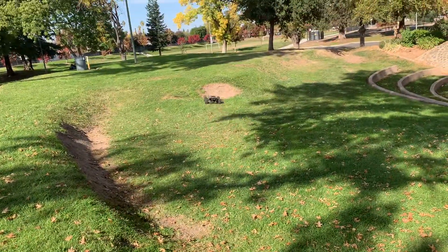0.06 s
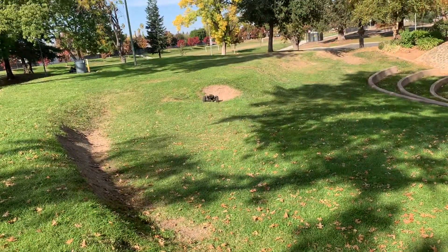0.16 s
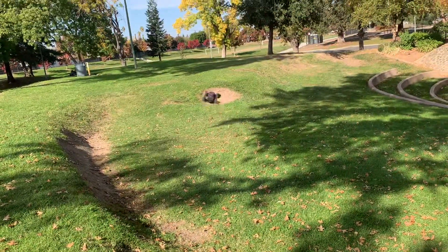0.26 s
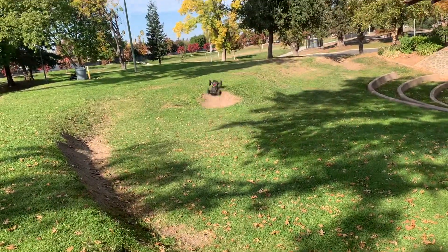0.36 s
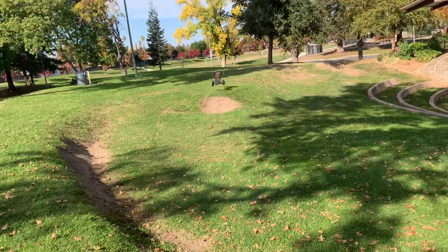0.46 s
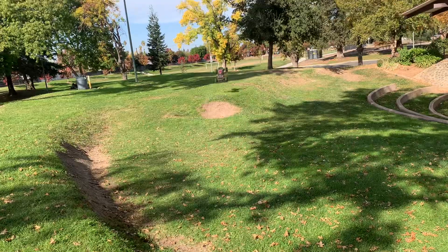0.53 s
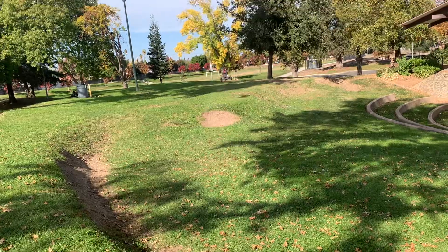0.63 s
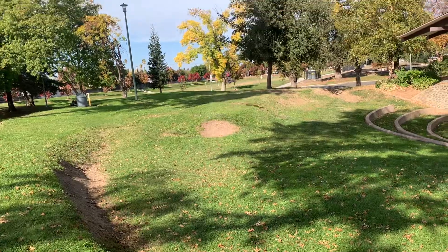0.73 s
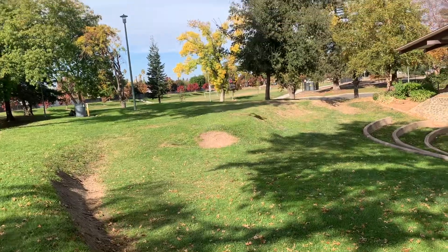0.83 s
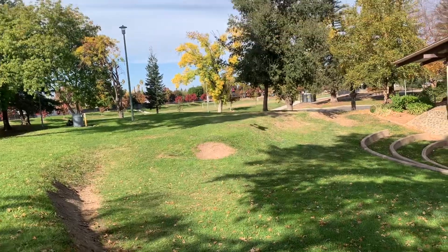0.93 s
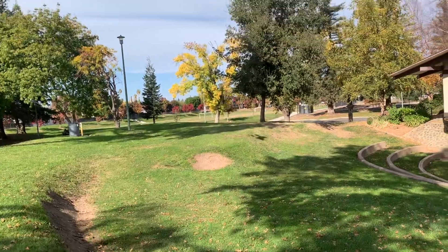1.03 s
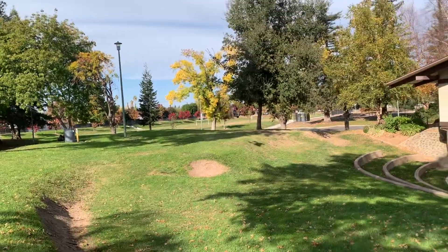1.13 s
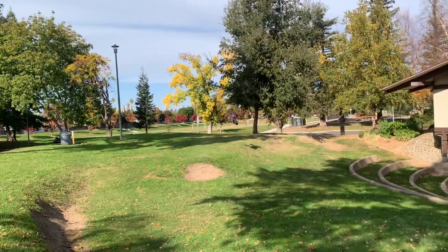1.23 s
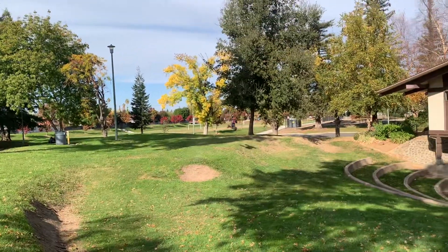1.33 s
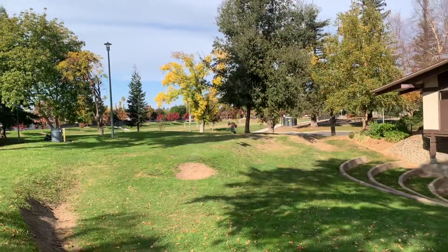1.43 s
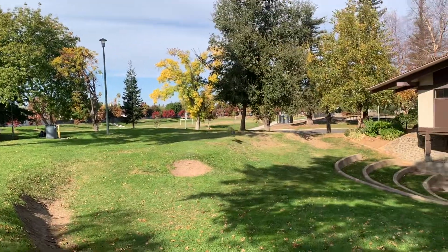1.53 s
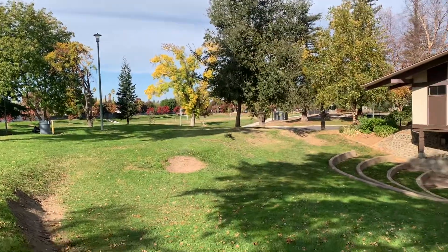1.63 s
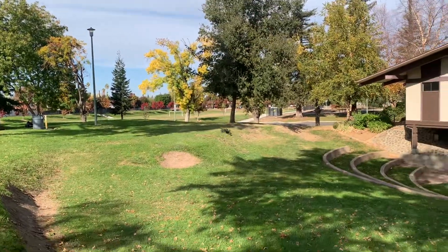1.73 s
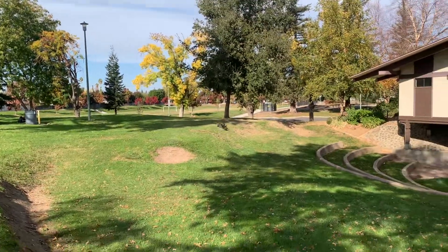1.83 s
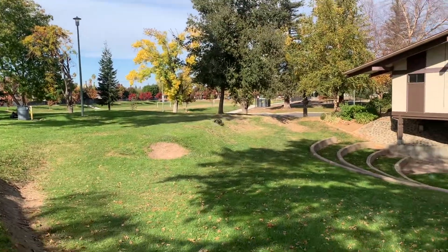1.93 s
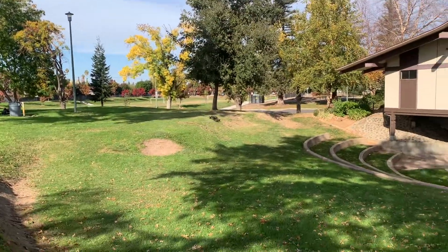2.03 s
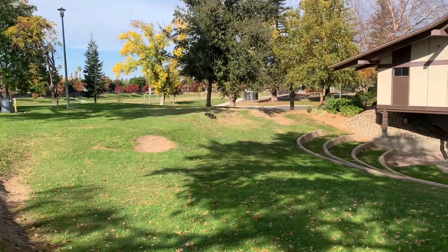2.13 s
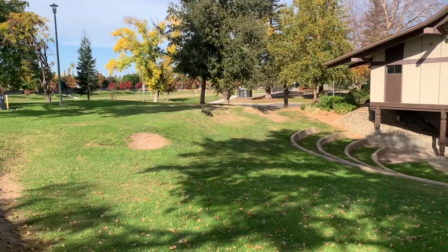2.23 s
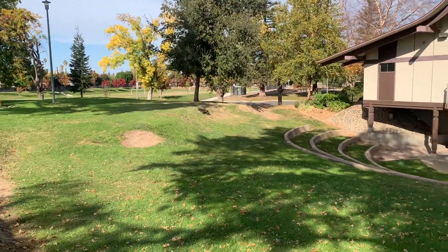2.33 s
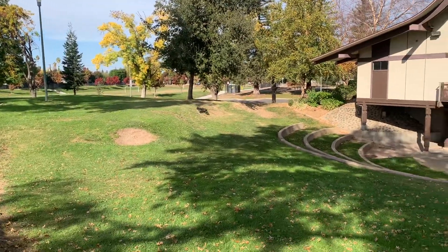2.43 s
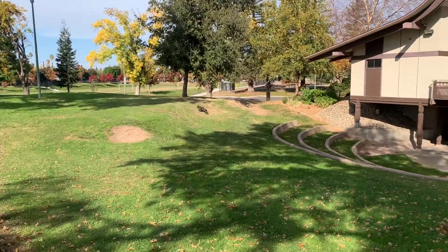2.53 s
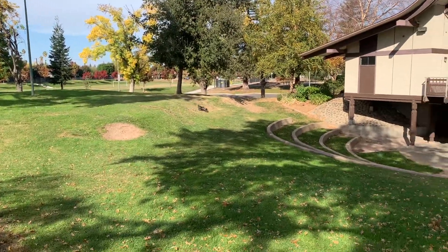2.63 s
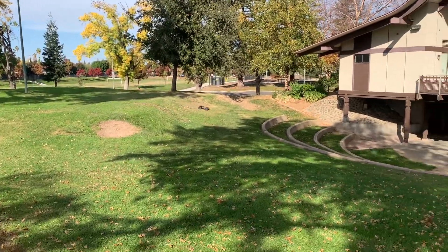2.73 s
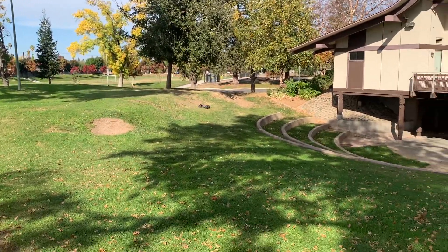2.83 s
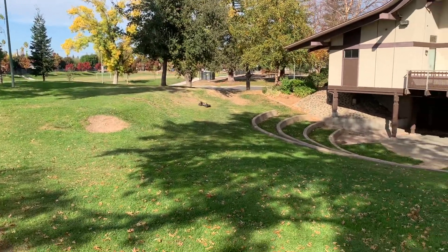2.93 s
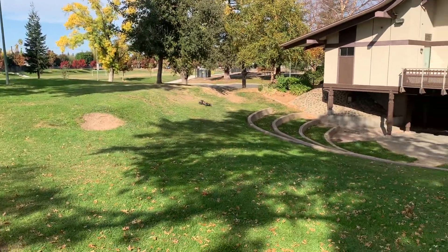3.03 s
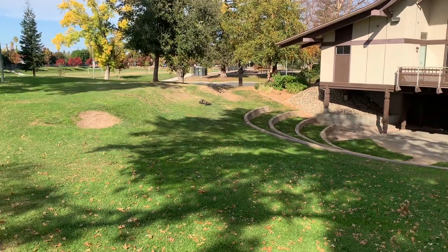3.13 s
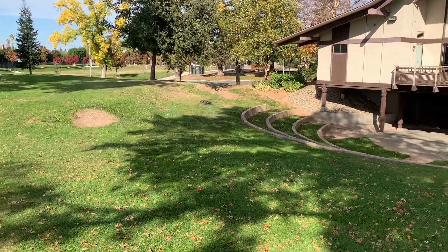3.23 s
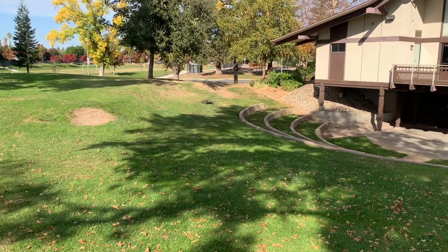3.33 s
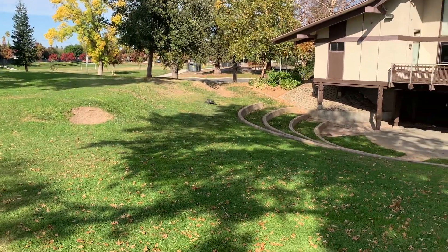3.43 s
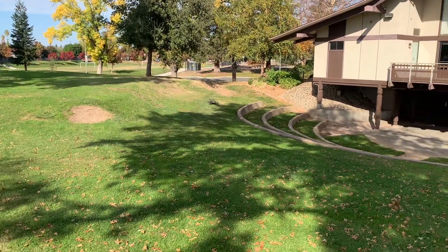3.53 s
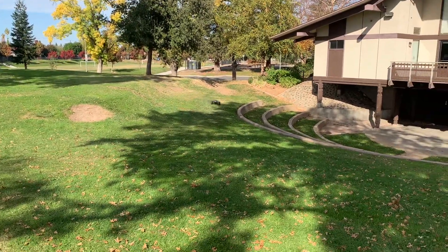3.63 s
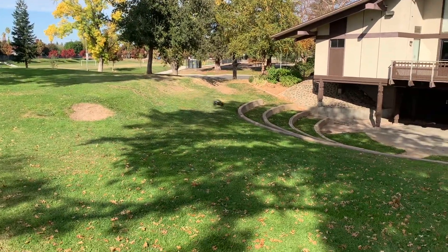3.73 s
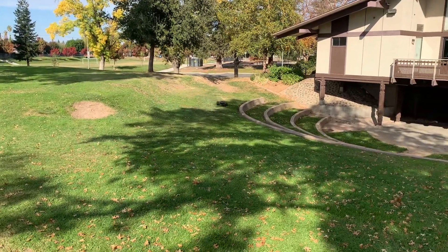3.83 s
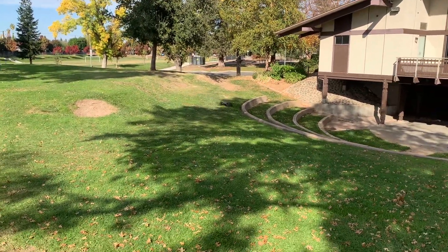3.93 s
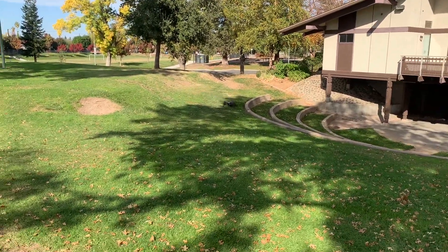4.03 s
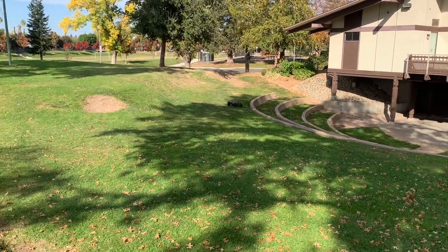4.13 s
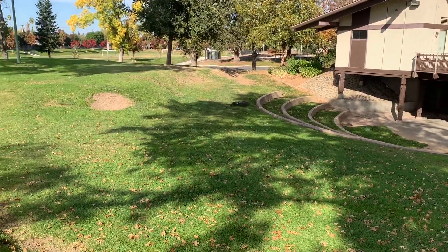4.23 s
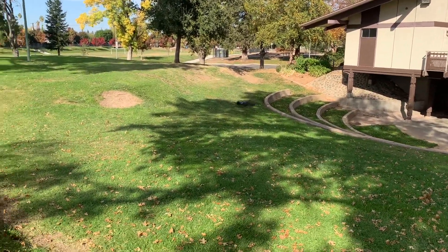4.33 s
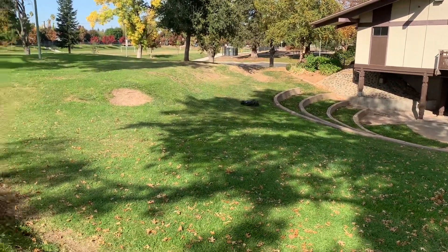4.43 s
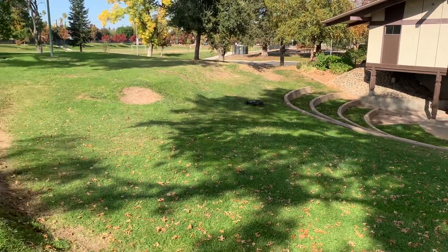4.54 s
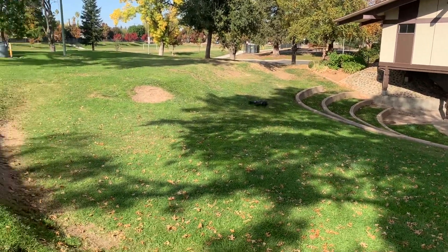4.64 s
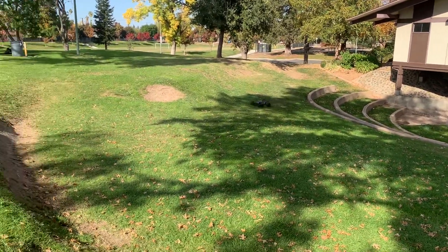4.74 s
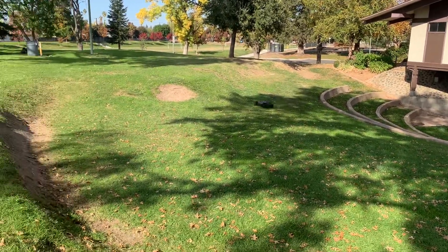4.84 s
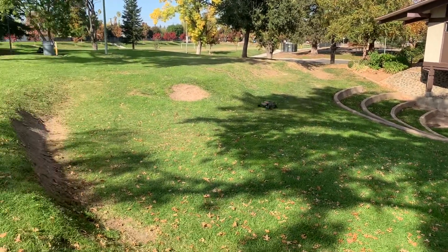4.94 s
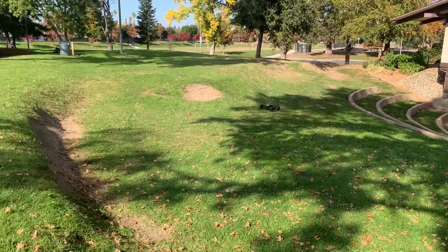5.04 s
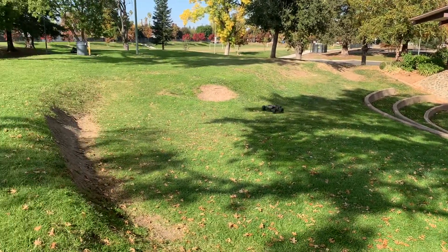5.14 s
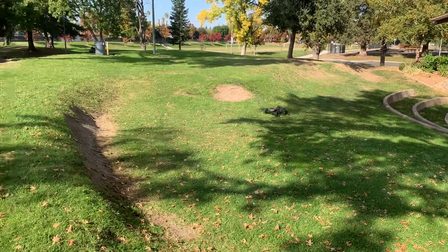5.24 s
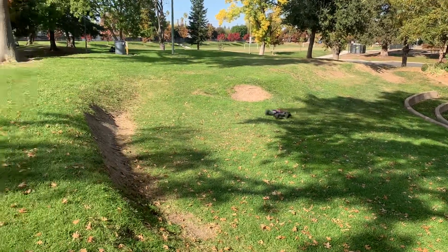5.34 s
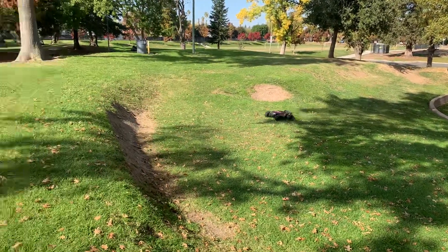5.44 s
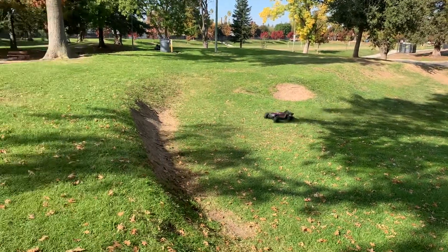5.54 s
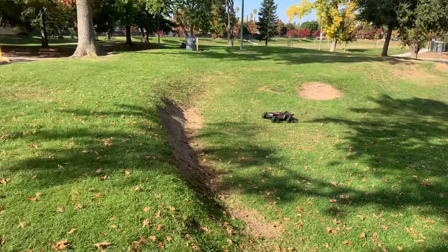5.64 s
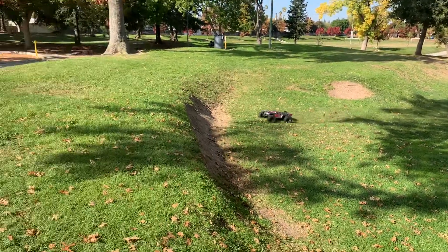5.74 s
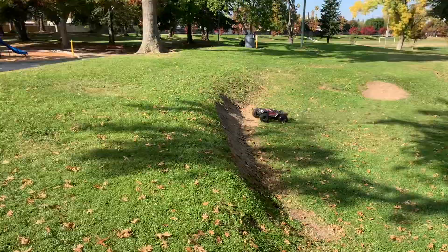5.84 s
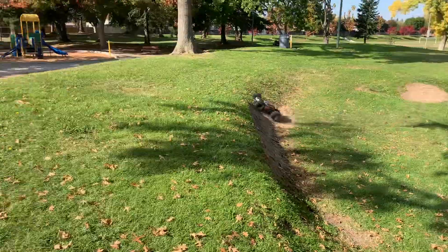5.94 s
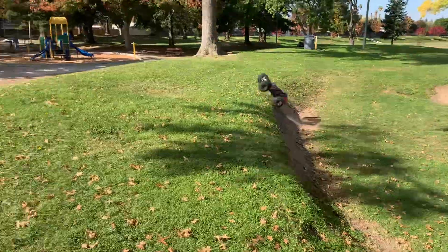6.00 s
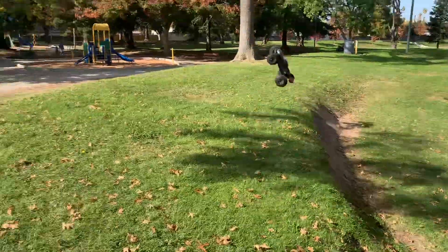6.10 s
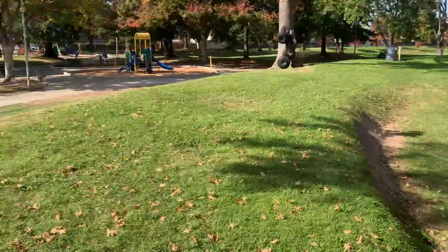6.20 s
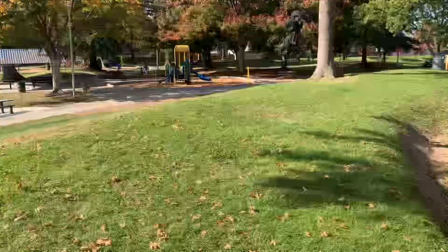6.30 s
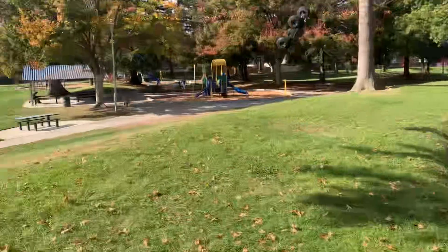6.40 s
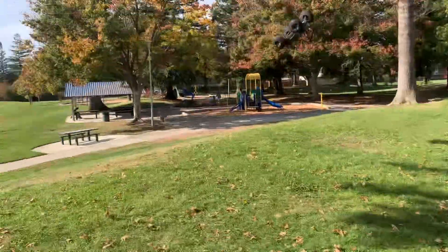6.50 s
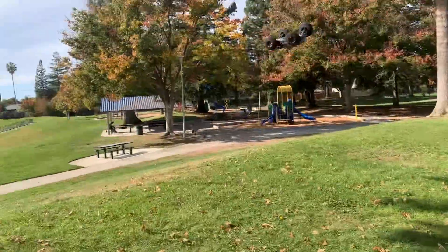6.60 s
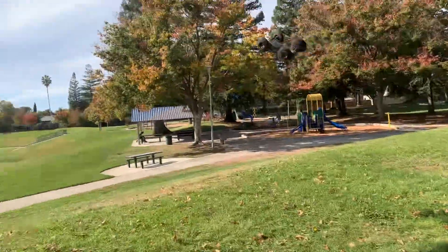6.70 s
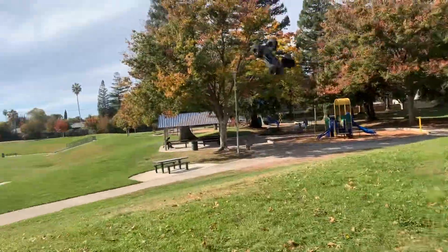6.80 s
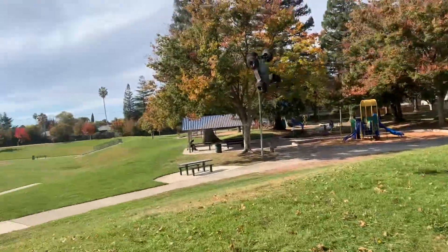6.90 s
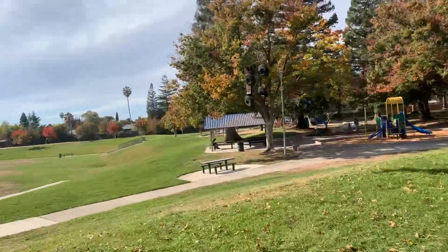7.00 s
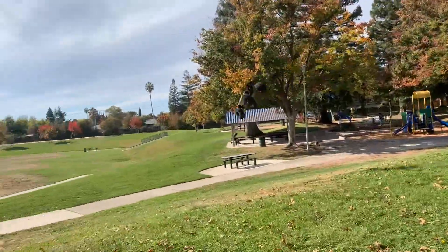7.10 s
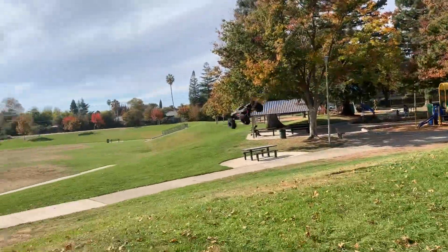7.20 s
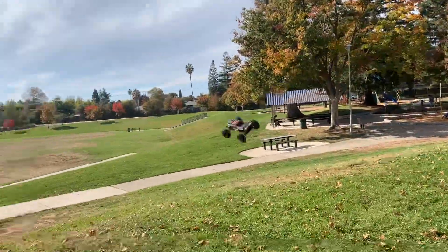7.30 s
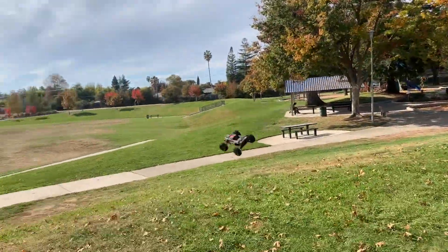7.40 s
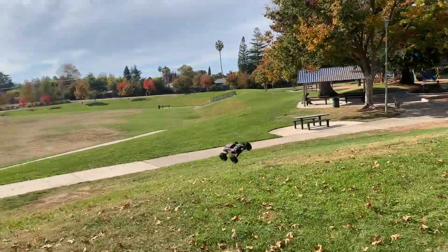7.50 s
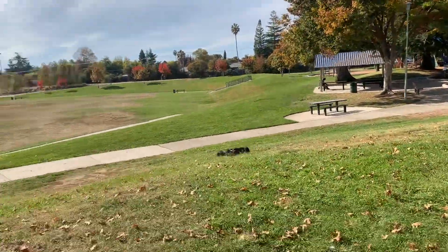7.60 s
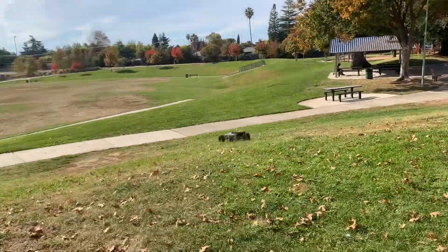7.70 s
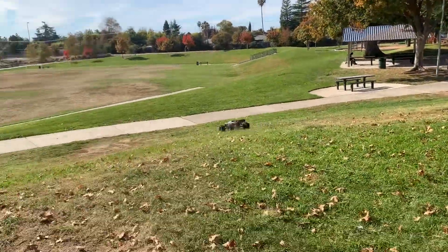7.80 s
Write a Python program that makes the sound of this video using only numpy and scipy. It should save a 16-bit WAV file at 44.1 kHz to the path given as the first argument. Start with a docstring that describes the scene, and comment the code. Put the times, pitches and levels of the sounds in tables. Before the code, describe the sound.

Gritty tyre scrapes, shrill electric throttle bursts and hard dirt knocks, a quiet distant stretch, then a loud jump with whirring, howling wheels and a thumping landing.

```python
"""A remote-control electric truck races over park grass, jumps two dirt mounds, tumbles with spinning wheels and lands.
Shaped noise makes its tyres and gears, fuzzy gliding tones its shell, ringing steel, motor and howling treads.
Throttle blips sweep the gear and motor whine; decaying sines thump and rattle, noise bursts tick through the frame.
Slams drum clods on the belly, far traffic rumbles, and two closely spaced microphone ports hear it all."""
import sys
import numpy as np
from scipy import signal
from scipy.fft import rfft, irfft, next_fast_len
from scipy.io import wavfile
from scipy.ndimage import uniform_filter1d, map_coordinates

SR = 44100
rng = np.random.default_rng(int(sys.argv[2]) if len(sys.argv) > 2 else 0)


def to_wav(sig):
    """Store sig (one row per channel, or 1-D mono) as 16-bit WAV at the path in sys.argv[1].

    Samples outside -1..1 are clipped; the rate is SR.
    """
    pcm = np.clip(np.atleast_2d(sig), -1, 1) * 32767
    pcm = np.round(pcm).astype(np.int16)
    wavfile.write(sys.argv[1], SR, pcm.T)  # frames by channels


N = 346626
T = np.arange(N) / SR
STRIKE_T = np.arange(SR // 4) / SR  # time within one knock, s
TOP_HZ = 15800  # upper band limit


def amp(db):
    """Gain of a dB value."""
    return 10 ** (np.asarray(db) / 20)


def unit(x):
    """x at rms 1."""
    return x / np.sqrt(np.mean(np.abs(x) ** 2) + 1e-20)


def together(*levels_db):
    """Level of unrelated sounds heard at once: their powers add."""
    return 10 * np.log10(sum(amp(db) ** 2 for db in levels_db))


def curves(rows):
    """One value per sample for each column after the time."""
    s, *cols = np.transpose(rows)
    return [np.interp(T, s, c) for c in cols]


def gate(rows, fade=0.0074):
    """1 while a table lasts, with soft ends."""
    return np.clip(np.minimum(T - rows[0][0], rows[-1][0] - T) / fade, 0, 1)


def wobble(rate):
    """A smooth random curve, rate knots a second."""
    return map_coordinates(rng.standard_normal(int(N * rate / SR) + 4), [T * rate])


def drift(shape, over_bins, over_frames):
    """A random field of rms 1, smooth over so many bins and frames."""
    field = uniform_filter1d(rng.standard_normal(shape), size=over_bins, axis=0)
    return unit(uniform_filter1d(field, size=over_frames, axis=1))


def filtered(x, response):
    """x times a complex response of frequency."""
    m = next_fast_len(N + 8192)
    return irfft(rfft(x, m) * response(np.fft.rfftfreq(m, 1 / SR)), m)[..., :N]


def resonances(modes):
    """Causal response of damped modes (pitch_hz, width_hz, level_db), alternating in sign."""
    def mode(f, c, w, db):
        return amp(db) * 1j * f * w / (c * c - f * f + 1j * f * w)
    return lambda f: sum((-1) ** k * mode(f, *row) for k, row in enumerate(modes))


def noise(points, patchy_db):
    """Noise of rms 1 with a drawn spectrum and time-frequency patches of random gain."""
    z = signal.stft(rng.standard_normal(N), nperseg=512)[2]
    x = signal.istft(z * amp(patchy_db * drift(z.shape, 5, 6)), nperseg=512)[1][:N]
    f, db = np.transpose(points)

    def spectrum(hz):
        return amp(np.interp(np.log(hz + 1), np.log(f), db, left=-120, right=-120))
    return unit(filtered(x, spectrum))


def tone(hz, width_hz, rough):
    """A gliding partial near rms 1: its rough share of the power is noise of the given width."""
    rough = np.clip(rough, 0, 1)
    fuzz = (wobble(width_hz) + 1j * wobble(width_hz)) / np.sqrt(2)
    carrier = np.exp(2j * np.pi * np.cumsum(hz) / SR)
    return np.sqrt(2) * np.real((np.sqrt(1 - rough) + np.sqrt(rough) * fuzz) * carrier)


LOAD_LEAD_S = 0.029  # the gears hiss before the whine comes through
LOAD_RISE_S, LOAD_FALL_DB_PER_S = 0.072, 62


def throttle_load():
    """Each throttle blip loads the gears, swells while it lasts, then falls away; level in dB."""
    blips_db = []
    for s, length, *_, load_db, _, _, swell_db in BLIPS:
        rise_db = 20 * np.log10(np.clip((T - s + LOAD_LEAD_S) / LOAD_RISE_S, 1e-4, 1))
        growing_db = swell_db * (np.clip((T - s) / length, 0, 1) - 1) / 2
        fall_db = LOAD_FALL_DB_PER_S * np.clip(T - s - length, 0, 3)
        blips_db.append(load_db + rise_db + growing_db - fall_db)
    return together(*blips_db)


# wheels light or off the ground: from_s, to_s, share spinning free (0-1)
FLIGHTS = [(-.3, 0.175, 0.26), (0.47, 1.562, 0.7), (6.01, 7.55, 0.9)]
LIFT_S = 0.21  # the wheels unload and load again over this time


def spinning_free():
    """Share of the wheels spinning without ground load, 0 to 1."""
    free = sum(np.clip(share, 0, 1) * np.clip(.5 + np.minimum(T - a, b - T) / LIFT_S, 0, 1)
               for a, b, share in FLIGHTS)
    return np.clip(free, 0, 1), free


# drivetrain between blips, louder when near and when the wheels spin fast: time_s, gear hiss_db, ringing_db
ROLL = [(0, -47.5, -33.5), (.228, -44.5, -42.5), (.55, -38, -39.5), (.65, -42, -41.5), (1.3, -48, -45),
        (1.55, -45, -53), (1.63, -68, -90), (1.7, -76, -104), (1.8, -44.5, -67), (2.36, -71, -67),
        (2.7, -52, -51), (2.92, -70, -69), (3.23, -71, -68), (3.5, -59, -71), (3.87, -43, -43),
        (4.22, -44, -39), (4.53, -58, -57), (5.0, -52.5, -40), (5.7, -37.5, -30.5), (6.2, -36, -33),
        (6.356, -38, -32.5), (6.542, -29.5, -24), (6.702, -33, -33.5), (6.766, -33, -25.5),
        (6.966, -30.5, -31), (7.18, -32.5, -27), (7.402, -30, -36.5), (7.53, -48.5, -58), (7.62, -54, -59),
        (7.75, -45.5, -50), (7.86, -70, -70)]
# gains from rolling, throttle load and slams into each part, dB
ROLL_TO_SCRAPE_DB, LOAD_TO_SCRAPE_DB, SLAM_TO_SCRAPE_DB = 1.7, 0.3, -6.5
ROLL_TO_WHIRR_DB, LOAD_TO_WHIRR_DB, SLAM_TO_WHIRR_DB = -6, -9.5, -22.5
SLAM_TO_HISS_DB, LOAD_TO_RING_DB, SLAM_TO_RING_DB = -15, 0.55, -21
SCRAPE_GROWS, RING_GROWS, MEAN_LOAD_DB = 0.61, 1.54, -50  # dB per dB around the mean load
FREE_SCRAPE_DB = -7  # tyres in the air are quieter


def levels():
    """Rolling, throttle load and slams set the levels of tyres, shell, gears and ringing steel."""
    roll_db, steel_db = curves(ROLL)
    load_db, slam_db = throttle_load(), slams()
    free, lift = spinning_free()

    def grown(db, rate):
        return MEAN_LOAD_DB + rate * (db - MEAN_LOAD_DB)
    scrape_db = together(grown(roll_db, SCRAPE_GROWS) + ROLL_TO_SCRAPE_DB + FREE_SCRAPE_DB * lift,
                         load_db + LOAD_TO_SCRAPE_DB, slam_db + SLAM_TO_SCRAPE_DB)
    whirr_db = together(curves(SHELL)[3], roll_db + ROLL_TO_WHIRR_DB,
                        load_db + LOAD_TO_WHIRR_DB, slam_db + SLAM_TO_WHIRR_DB)
    hiss_db = together(roll_db, load_db, slam_db + SLAM_TO_HISS_DB)
    ring_db = together(steel_db, grown(load_db, RING_GROWS) + LOAD_TO_RING_DB, slam_db + SLAM_TO_RING_DB)
    return scrape_db, whirr_db, hiss_db, ring_db, free


# tyres on the ground, relative spectrum: pitch_hz, level_db
SCRAPE = [(53, -21), (90, 2.5), (294, 1), (347, -6), (541, -2), (881, -15), (985, -16.5), (1340, -16),
          (2500, -43), (3250, -18.5), (5500, -120)]
# tyres stirring the air, relative spectrum: pitch_hz, level_db
FAN = [(120, -3.5), (250, -16.5), (400, 2), (650, 0), (800, -8.5), (1200, -2), (2500, -64)]


def tyres(scrape_db, free, bumps):
    """Treads tear the grass, and fan the air when the wheels spin free."""
    ground = np.sqrt(1 - free) * noise(SCRAPE, patchy_db=-1.0)
    air = np.sqrt(free) * noise(FAN, patchy_db=1.5)
    return amp(scrape_db + 1.31 * bumps + 1.2 * wobble(120)) * (ground + air)


# gears under load, relative spectrum: pitch_hz, level_db
HISS = [(700, -32), (1500, 0.5), (2000, 3), (2450, 5), (3000, -2.5), (3800, -0.5), (5600, -3), (7000, -4.5),
        (10500, 0), (13500, -35), (15800, -12)]
# gears running free, relative spectrum: pitch_hz, level_db
SPIN = [(700, -15), (1500, 7), (2600, 4.5), (4000, 1.5), (6000, -2), (9000, -5), (12300, -4.5),
        (14000, -62), (15800, -34)]


def gears(hiss_db, free, bumps):
    """Gear teeth hiss, with one colour under load and another running free."""
    loaded = np.sqrt(1 - free) * noise(HISS, patchy_db=3.0)
    idle = np.sqrt(free) * noise(SPIN, patchy_db=2.5)
    return amp(hiss_db + 0.85 * bumps + 1.53 * wobble(400)) * (loaded + idle)


def whirr(hz, width_hz):
    """One air resonance of the body shell: a rough core, thin wheel tones beside it and wide skirts."""
    flutter_hz = hz * (1 + .01 * wobble(10))
    strands = sum(amp(3 * wobble(8)) * tone(share * flutter_hz, width_hz=30, rough=.8)
                  for share in (.93, 1.0, 1.07))
    core = amp(3.2 * wobble(40)) * tone(flutter_hz, width_hz, rough=.9)
    return core + amp(-7) * strands + amp(-5.5) * tone(hz, 5 * width_hz, rough=1)


# air in the body shell and steel ringing:
# time_s, lower whirr_hz, upper whirr_hz, upper over lower_db, whirr_db, ringing_hz
SHELL = [(0, 1132, 1873, 7, -38, 13900), (.25, 1148, 1885, 12, -40.5, 13600),
         (.42, 1249, 1748, 11, -39, 13300), (.6, 1208, 1635, 1, -37, 13400),
         (1.2, 1132, 1528, -12, -37.5, 13650), (1.5, 1110, 1544, -4, -44.5, 13540),
         (1.7, 1111, 1505, -5, -59, 13500), (3, 1100, 1608, 1, -72, 14120),
         (5.9, 1095, 1610, 0, -56, 13950), (6.2, 998, 1415, 1.5, -33.5, 13540),
         (6.7, 968, 1352, 5, -30, 13410), (6.96, 943, 1391, 11, -21.5, 13330),
         (7.06, 967, 1310, 11.5, -27.5, 13350), (7.25, 980, 1408, 9, -27, 13200),
         (7.41, 1013, 1597, -1, -34, 13470), (7.54, 1003, 1493, -15, -54, 13600),
         (7.74, 1000, 1497, -12, -65, 13600)]


def shell(whirr_db):
    """Air in the body shell whirrs at two gliding resonances with a faint higher one."""
    low_hz, high_hz, tilt_db, _, _ = curves(SHELL)
    lower = whirr(low_hz, width_hz=130)
    upper = whirr(high_hz, width_hz=130) + amp(-19) * whirr(1.8 * high_hz, width_hz=300)
    body = (lower + amp(tilt_db) * upper) / np.sqrt(1 + amp(2 * tilt_db))
    return amp(whirr_db - 7) * body


# ringing steel: share of the ringing pitch, width_hz, relative level_db
RINGS = [(0.974, 58.9, -6.5), (0.998, 90.8, 4.5), (1.018, 91, -31), (1.125, 248, -15), (1.147, 192.5, -0.5)]


def steel(ring_db, free, bumps):
    """Steel parts sizzle near the top of hearing; their separate rings come out when spinning free."""
    ring_hz = curves(SHELL)[4]
    rings = sum(amp(db + 3.5 * wobble(24)) * tone(share * ring_hz, width, rough=.9)
                for share, width, db in RINGS)
    sizzle = tone(ring_hz, width_hz=1300, rough=1)
    sizzle = sizzle + amp(-4) * tone(.92 * ring_hz, width_hz=2600, rough=1)
    return amp(ring_db - 7.5 + 3.24 * bumps) * (amp(1.5) * free * rings + sizzle)


def running():
    """Tyres, gears, shell and steel move together with the truck."""
    scrape_db, whirr_db, hiss_db, ring_db, free = levels()
    bumps = wobble(30)  # the rough ground shakes tyres, gears and steel at once
    return (tyres(scrape_db, free, bumps) + gears(hiss_db, free, bumps)
            + shell(whirr_db) + steel(ring_db, free, bumps))


# level of the low rumble: time_s, level_db
RUMBLE = [(0, -39.5), (.48, -44), (.68, -45.5), (1.29, -40), (1.62, -44), (1.9, -41.5), (3.4, -41.5),
          (3.96, -44.5), (4.4, -39.5), (4.55, -43), (5.1, -42.5), (5.91, -38.5), (6.19, -39), (7.38, -40),
          (7.51, -37.5), (7.86, -39.5)]
# far traffic, relative spectrum: pitch_hz, level_db
TRAFFIC = [(12, -68), (20, -31), (32, -18), (43, 1.5), (65, 5.5), (156, -7), (205, -18.5), (242, -16.5),
           (325, -26), (3000, -37.5), (3900, -90), (6600, -120)]
# thin air hiss, relative spectrum: pitch_hz, level_db
AIR = [(1500, -30), (3000, 14), (7000, 11), (12500, -57), (14000, 21), (15800, -34)]


def park():
    """Far traffic in slow lumps and a thin hiss of air."""
    rumble_db, = curves(RUMBLE)
    traffic = amp(rumble_db + 2.66 * wobble(9)) * noise(TRAFFIC, patchy_db=0.5)
    return traffic + amp(-68) * noise(AIR, patchy_db=3)


# sharp ticks: start_s, relative level_db, relative brightness_db
TICKS = [(0.2462, -23, -7), (.259, -26, -28), (.288, -33, -29), (.339, -20, -10), (.361, -21, -6),
         (0.4488, -13, -17), (1.3523, -15.5, -17), (1.736, -36, -12), (2.128, -40, -10), (2.368, -40, -12),
         (3.074, -48, -9), (4.468, -59, -9), (4.5675, -46, -8), (4.8332, -43, -3), (5.93, -19, -12),
         (5.943, -10, -20), (5.9777, -1, 5), (5.985, -11, -5), (6.0, -18, -17), (6.007, -11, 13.5),
         (6.052, -15.5, 14.5), (7.5747, -33, -18), (7.616, -31, -15), (7.644, -23.5, -32),
         (7.674, -28, -30), (7.7001, -33, -25), (7.806, -31, -27), (7.833, -30, -26), (7.846, -25, -40)]
# plastic frame modes: pitch_hz, width_hz, level_db
CHASSIS = [(720, 210, 5.5), (1120, 150, 6.5), (1510, 380, 5), (2770, 160, 2.5), (3950, 1400, -8)]


def ticks():
    """Joints and twigs tick: short noise bursts ring the frame and add a bright snap."""
    frame, bright = np.zeros((2, N + SR))
    for s, db, bright_db in TICKS:
        burst = amp(db - 60 * STRIKE_T / .015) * rng.standard_normal(len(STRIKE_T))
        frame[round(s * SR):][:len(burst)] += amp(3) * burst
        bright[round(s * SR):][:len(burst)] += amp(bright_db - 9.0) * burst

    def snap(f):  # two-stage high-pass at 5 kHz
        return (1j * f / 5000) ** 2 / (1 + 1j * f / 5000) ** 2
    return filtered(frame[:N], resonances(CHASSIS)) + filtered(bright[:N], snap)


# throttle blips, levels relative: start_s, length_s, mesh sag_hz, lowest mesh_hz, climb towards_hz,
# climb time_s (negative: it steepens), load_db, gear_db, motor whine_db, swell_db
BLIPS = [(0.265, 0.083, -3, 2600, 3630, .06, -39, -35, -25.5, 11),
         (0.339, .114, 719, 2885, 4036, .016, -42, -35.5, -33.5, -4.5),
         (2.387, 0.15, 570.5, 1040, 2116, .016, -46.5, -53, -55, -6.5),
         (3.263, 0.21, 300, 1350, 2384, 0.055, -50.5, -58, -55.5, -13),
         (3.586, 0.072, -8.5, 1720, 2223, 0.292, -49.5, -67, -51, -5),
         (3.656, 0.12, 6.5, 2554, 3430, -0.15, -41, -38.5, -41.5, 6),
         (3.945, 0.17, 373, 3600, 4750, -.15, -66, -46, -39, 0.5),
         (4.557, 0.12, -2, 2112, 2640, 0.08, -43, -46.5, -44, 5.5),
         (4.825, 0.12, 3.5, 2193, 2433, .03, -43, -51.5, -39.5, 6.5),
         (5.013, 0.14, 4.5, 2650, 3395, 0.28, -38.5, -42, -36.5, 3.5),
         (5.32, 0.086, 9, 2800, 3110, .025, -58, -45.5, -43, -4),
         (5.799, 0.113, 0, 2943, 4450, 0.86, -38, -33.5, -20.5, 20.5)]
WHINE_ORDER, STRAND_ORDER = 2.42, 2.2  # motor whine and a weaker strand under it, over gear mesh
BLUR_FROM_HZ, BLUR_FULL_HZ = 5500, 8500  # the whine frays as it climbs between these pitches
SPEED_JITTER = .01  # share by which bumps shake the motor speed
SAG_HZ_PER_S = 19000  # the tyres bite and drag the motor down


def throttle():
    """Under throttle the mesh tone, the whine and its blurred octave climb together."""
    hz, gear, high = np.zeros((3, N))
    for s, length, sag_hz, low_hz, top_hz, climb_s, _, gear_db, whine_db, swell_db in BLIPS:
        u = np.clip((T - s) / length, 0, 1)
        on = gate([(s,), (s + length,)], fade=.011)
        after = T - s - sag_hz / SAG_HZ_PER_S  # time since the lowest pitch
        climbed = np.expm1(-np.clip(after, 0, 1) / climb_s) / np.expm1(-length / climb_s)
        sagging_hz = SAG_HZ_PER_S * np.maximum(-after, 0)
        hz = np.where(on > 0, low_hz + sagging_hz + (top_hz - low_hz) * climbed, hz)
        gear += on * amp(gear_db + swell_db * (u - 1) / 2)
        high += on * amp(whine_db + swell_db * (u - 1))
    hz = hz * (1 + SPEED_JITTER * wobble(45))
    mesh = tone(hz, width_hz=280, rough=0.55) + amp(-8) * tone(2 * hz, width_hz=600, rough=1)
    whine_hz = WHINE_ORDER * hz
    octave = amp(-2.5) * (2 * whine_hz < TOP_HZ) * tone(2 * whine_hz, width_hz=900, rough=1)
    strand = amp(-3 + 4 * wobble(25)) * tone(STRAND_ORDER * hz, width_hz=500, rough=.9)
    blur = np.clip((whine_hz - BLUR_FROM_HZ) / (BLUR_FULL_HZ - BLUR_FROM_HZ), .15, 1)
    frayed = blur * (strand + amp(-2) * tone(whine_hz, width_hz=2400, rough=1))
    whine = tone(whine_hz, width_hz=350, rough=.48 + .4 * blur) + frayed + octave
    # the teeth load unevenly
    return gear * amp(3 * wobble(55)) * mesh + high * amp(2.5 * wobble(40) - 1.5) * whine


# tyres and belly slam into the soil: peak_s (the level rises into it), level_db, rise_db_per_s, hold_s,
# fall_db_per_s
SLAMS = [(0.287, -26.5, 402, 0.02, 58), (0.359, -19, 200, 0.015, 185), (0.4, -17, 400, 0.015, 303),
         (0.47, -36, 203, 0.027, 75), (1.353, -40, 500, 0.0017, 600), (1.752, -26, 665, 0.056, 204),
         (4, -32, 89, 0.025, 26.5), (5.119, -37, 117, 0.0069, 53), (5.389, -28, 191.5, 0.0027, 200),
         (5.694, -37, 39, 0.11, 98), (5.907, -22, 93, .015, 201), (5.933, -13.5, 402, 0.017, 700),
         (5.971, -12, 697, 0.053, 898), (6.059, -23, 302, 0.004, 132), (6.55, -29.5, 81, 0.0056, 24),
         (7.584, -23.5, 1101, 0.003, 199), (7.639, -27.5, 302, 0.013, 165), (7.686, -35, 197, 0.021, 900),
         (7.792, -39.5, 600, 0.054, 300)]


def slams():
    """Level of the truck pressing into the soil, dB."""
    slams_db = []
    for s, db, rise, hold, fall in SLAMS:
        drop_db = rise * np.maximum(s - T, 0) + fall * np.maximum(T - s - hold, 0)
        slams_db.append(db - np.minimum(drop_db, 120))
    return together(*slams_db)


# skid plate and shell modes: pitch_hz, width_hz, level_db
BELLY = [(158.5, 37, 4.5), (289, 70, 6), (516, 145, 6.5), (704, 155, 1.5), (980, 204, -1.5),
         (1640, 600, -17.5), (2690, 190, -10)]
CLODS_PER_S, CLOD_SCATTER_DB, CRUNCH_OVER_DB = 1500, 3.5, -7  # last: level over the slam


def crunch():
    """In a slam, stones and clods of uneven size drum on the resonant belly."""
    hits = rng.random(N) < CLODS_PER_S / SR
    clods = hits * rng.standard_normal(N) * amp(CLOD_SCATTER_DB * rng.standard_normal(N))
    return amp(slams() + CRUNCH_OVER_DB) * unit(filtered(clods, resonances(BELLY)))


# chassis on soil: start_s, relative level_db, settled pitch_hz, 60 dB decay_s
THUMPS = [(0.329, -35, 286, 0.091), (1.316, -21.5, 67.1, 0.1), (1.738, -27, 107.5, 0.12),
          (2.243, -40, 80, 0.11), (2.802, -25, 73, 0.078), (2.86, -27, 100, 0.092),
          (4.456, -24, 90.5, 0.0344), (5.95, -32, 182, 0.12), (5.979, -20, 150, 0.097),
          (5.993, -19, 63, 0.089), (7.584, -9.5, 141, 0.06), (7.623, -5, 90, 0.02),
          (7.635, -19.5, 99, 0.083), (7.647, -24, 95.5, 0.092), (7.757, -46, 74.5, 0.079),
          (7.79, -18, 83.6, 0.046)]


def thumps():
    """The chassis thumps the soil: damped low sines whose pitch sags as the soil gives."""
    out, t = np.zeros(N + SR), STRIKE_T
    for s, db, hz, decay_s in THUMPS:
        sagging = np.sin(2 * np.pi * hz * (t + 0.0035 * (1 - np.exp(-t / 0.0012))))
        attack = 1 - np.exp(-t / 0.0055)
        out[round(s * SR):][:len(t)] += amp(db + 7.5 - 60 * t / decay_s) * sagging * attack
    return out[:N]


# gear mesh diving as the wheels lock: time_s, pitch_hz, level_db
STOP = [(1.45, 3336, -47), (1.475, 2750, -46.5), (1.505, 1765, -44), (1.535, 1007, -43)]
# braking motor, two passages: time_s, pitch_hz, level_db, octave below_db
BRAKE = [
    [(1.42, 1970, -54, -48), (1.49, 1970, -42, -39.5), (1.54, 1970, -49, -43.5), (1.57, 1950, -56, -49),
     (1.67, 2050, -65, -58)],
    [(7.3, 2033, -58, -46), (7.33, 1972, -31, -44), (7.44, 1994, -34, -46), (7.46, 1970, -39.5, -53),
     (7.55, 1990, -55.5, -65)],
]


def braking():
    """The mesh dives as the wheels lock; the braking motor holds a buzzing tone and its lower octave."""
    stop_hz, stop_db = curves(STOP)
    out = gate(STOP) * amp(stop_db) * tone(stop_hz, width_hz=400, rough=.9)
    for rows in BRAKE:
        hz, db, low_db = curves(rows)
        hum = amp(3.5 * wobble(35)) * tone(hz, width_hz=90, rough=.68)
        upper = sum(tone(share * hz, width_hz=width, rough=1)
                    for share, width in ((1.31, 270), (1.5, 200), (1.72, 300)))
        buzz = amp(-6.5) * upper + amp(-6) * tone(.79 * hz, width_hz=250, rough=1)
        low = tone(hz / 2, width_hz=84, rough=0.65)
        out += gate(rows) * (amp(db) * (hum + buzz) + amp(low_db) * low)
    return out


# a loose part settling: start_s, relative level_db, pitch_hz
RATTLES = [(1.8804, -34, 2760), (1.9078, -32, 2650), (1.951, -35, 2670), (1.9809, -36.5, 2740),
           (2.025, -40, 2790), (2.0255, -40, 1570), (2.0579, -39, 2044), (2.072, -46.5, 1470),
           (2.088, -44, 990), (2.122, -45.5, 1180), (2.1691, -47, 1220), (2.2, -41.5, 2060),
           (2.212, -51, 2030), (2.245, -53, 1680), (2.3193, -51, 1760), (2.5617, -34, 2880),
           (2.6256, -30.5, 2680)]
RATTLE_BODY_HZ, RATTLE_BODY_DB, RATTLE_ROUGH_DB = 1216, -5.5, -3.5


def rattles():
    """A loose part rattles: a gritty damped sine, and what it sits on rings too."""
    out, t = np.zeros(N + SR), STRIKE_T
    for s, db, hz in RATTLES:
        grit = 1 + amp(RATTLE_ROUGH_DB) * rng.standard_normal(len(t))
        part = np.sin(2 * np.pi * hz * t) * grit
        body = amp(RATTLE_BODY_DB) * np.sin(2 * np.pi * RATTLE_BODY_HZ * t)
        attack = 1 - np.exp(-t / 0.0018)
        out[round(s * SR):][:len(t)] += amp(db - 60 * t / 0.031) * (part + body) * attack
    return out[:N]


# tyres spinning free in the air: time_s, pitch_hz, level_db
HOWL = [(6.12, 458, -33.5), (6.198, 475.3, -45), (6.284, 455.8, -35.5), (6.498, 451, -31.5),
        (6.642, 539.3, -34), (6.66, 594, -50), (6.7, 541, -37.5), (6.952, 514.5, -26), (7.114, 489.6, -32),
        (7.2, 490, -49)]


def howl():
    """Tread blocks chop the air at a nearly pure pitch."""
    hz, db = curves(HOWL)
    chopped = tone(hz * (1 + .008 * wobble(18)), width_hz=40, rough=.16)
    return gate(HOWL, fade=.04) * amp(db) * chopped


# the two ports: pitch_hz, left lag from ahead_rad, left lag from the right_rad, left louder_db, likeness (0-1)
PORTS = [(40, 0, 0, 2, .62), (100, .1, .1, 2.8, .75), (180, .15, .2, 3.5, .94), (500, .3, .3, 1, .92),
         (1300, .2, .4, .7, .92), (2000, .1, .9, 1.5, .88), (3500, .8, 2.4, 3, .75),
         (4800, 1.6, 3.8, 5, .6), (5800, 3.4, 5, 4.5, .7), (7000, 4.7, 6.3, 0, .7),
         (8000, 4.3, 5.2, 0, .75), (9000, 3.2, 3.2, 0, 1), (10500, 3, 3, 0, 1), (11500, 1.2, 1.2, 0, .65),
         (12300, 0, 0, 0, 1), (14200, 0, 0, 0, 1), (14800, -1, -1, 0, .65), (15800, -3, -3, 0, .8)]
# where the sound arrives from: time_s, share from the right (0-1)
BEARING = [(0, 0.27), (2, 0.1), (2.7, 0.025), (4, 0.42), (4.6, 1), (6.3, 1), (7.86, 0.8)]


def ports(x):
    """The ports hear a lag that depends on pitch and bearing; scattered sound makes them differ."""
    f, ahead, right, louder_db, alike = np.transpose(PORTS)
    z = signal.stft(x, nperseg=1024)[2]
    turned = z * np.exp(2j * np.pi * drift(z.shape, 12, 40))
    scattered = unit(signal.istft(turned, nperseg=1024)[1][:N]) * np.std(x)
    sign = np.array([[1], [-1]])  # left, right

    def pair(lag):
        def half(hz):  # each port takes half the level and lag difference
            gain = amp(sign * np.interp(hz, f, louder_db) / 2)
            return gain * np.exp(-.5j * sign * np.interp(hz, f, lag))

        def turn(hz):  # mixing angle of direct and scattered sound
            return np.arccos(np.clip(np.interp(hz, f, alike), 0, 1)) / 2
        direct = filtered(x, lambda hz: half(hz) * np.cos(turn(hz)))
        return direct + filtered(scattered, lambda hz: sign * half(hz) * np.sin(turn(hz)))
    share = np.clip(curves(BEARING)[0], 0, 1)
    return (1 - share) * pair(ahead) + share * pair(right)


def scene():
    """Truck and park, as the two ports hear them."""
    truck = running() + ticks() + throttle() + crunch() + thumps() + braking() + rattles() + howl()
    return ports(truck + park())


# microphone housing peaks: pitch_hz, width_hz, level_db
CAPSULE = [(6110, 900, 2), (8840, 840, 4.5)]


def record(dry):
    """The microphone housing lifts two treble bands; nothing passes above the band limit."""
    def housing(hz):
        lift_db = sum(db * np.exp(-2 * ((hz - c) / w) ** 2) for c, w, db in CAPSULE)
        return (hz < TOP_HZ) * amp(lift_db)
    return filtered(dry, housing)


dry = scene()
out = record(dry)
to_wav(out)
```